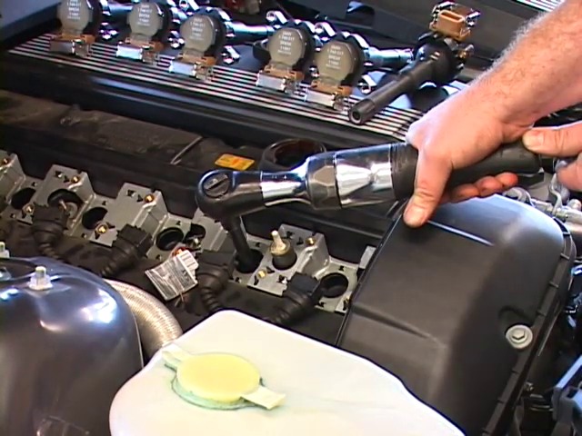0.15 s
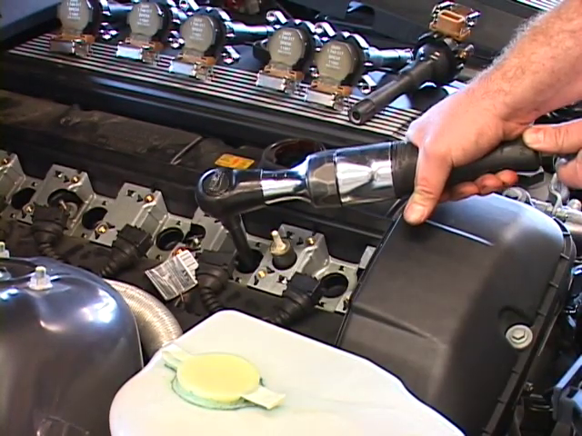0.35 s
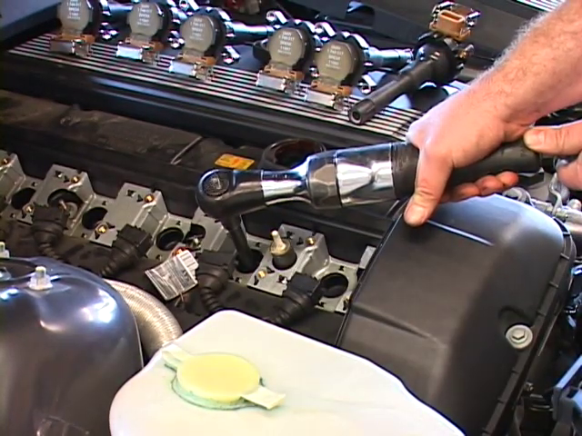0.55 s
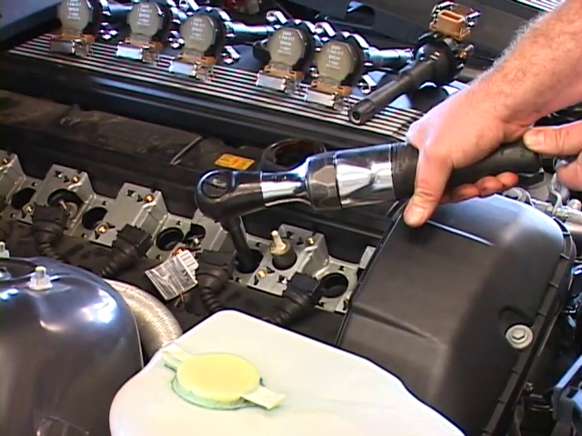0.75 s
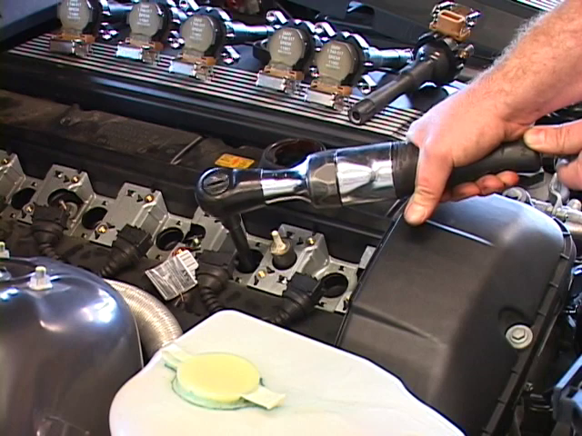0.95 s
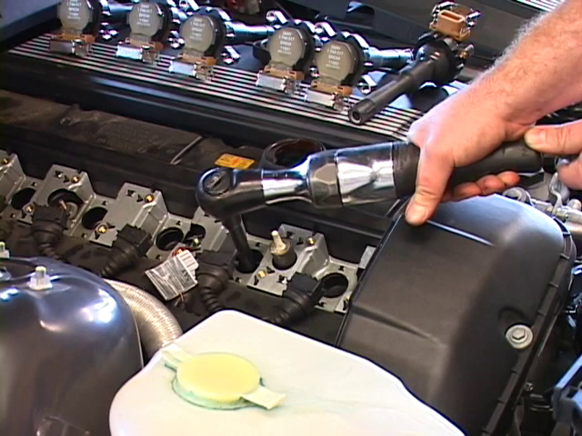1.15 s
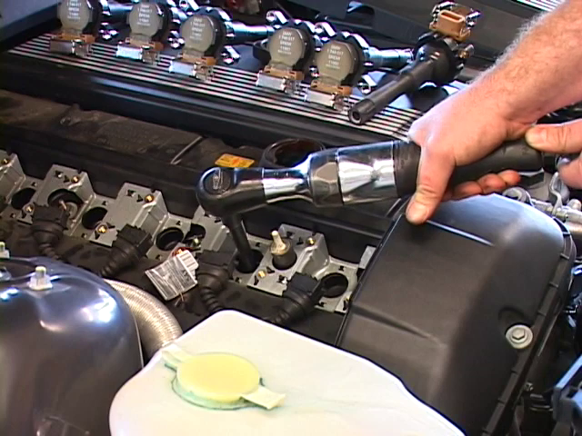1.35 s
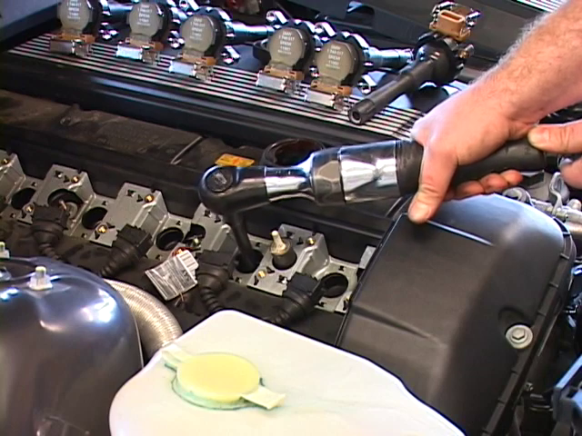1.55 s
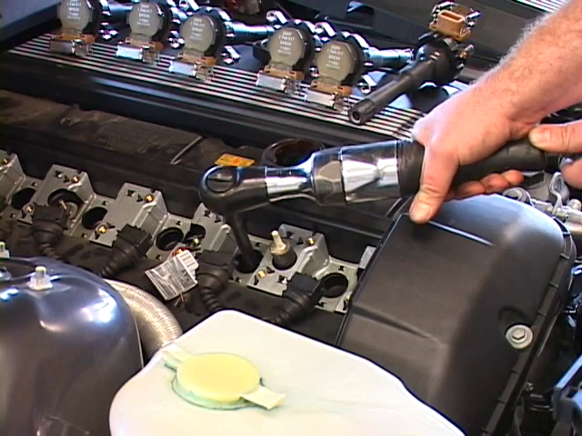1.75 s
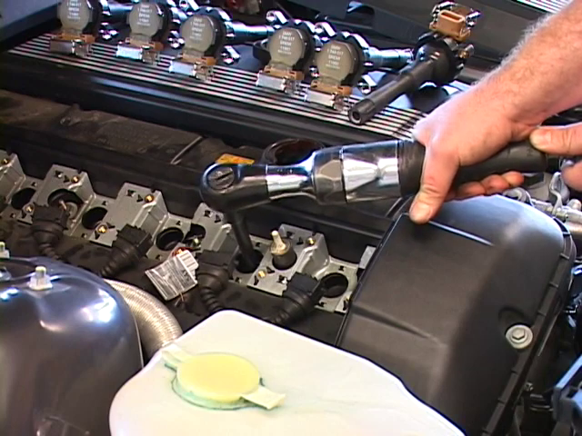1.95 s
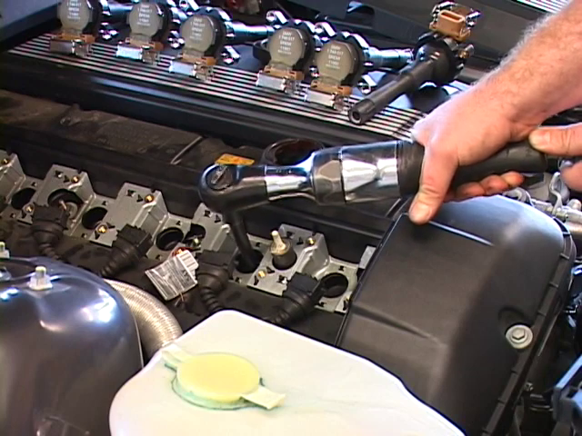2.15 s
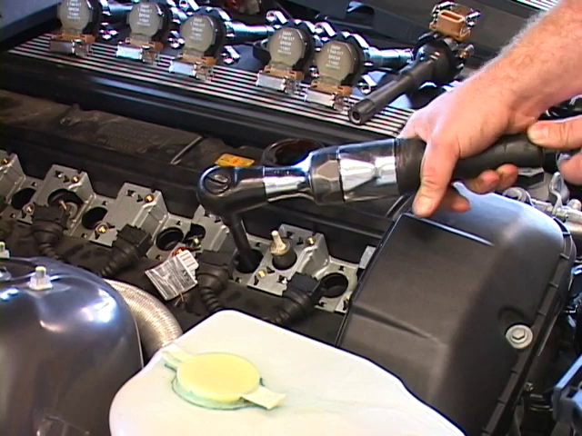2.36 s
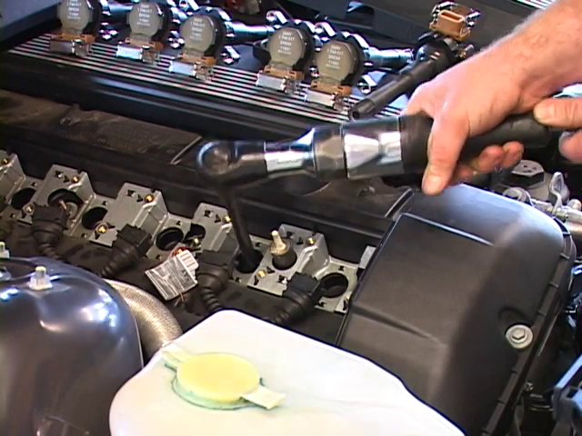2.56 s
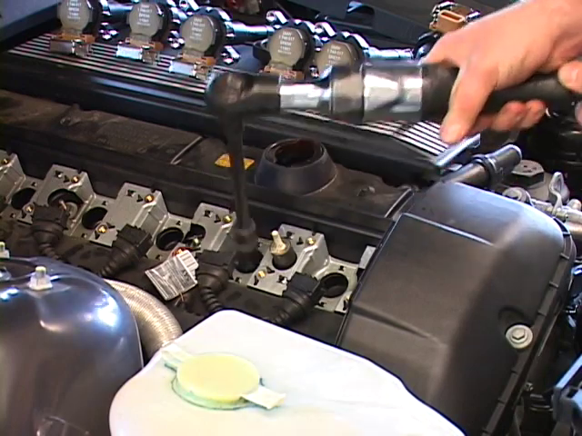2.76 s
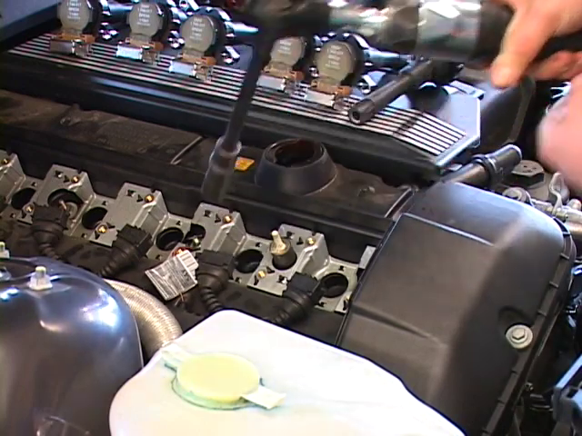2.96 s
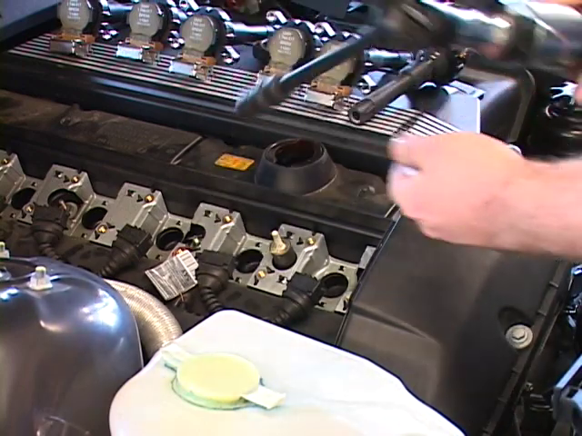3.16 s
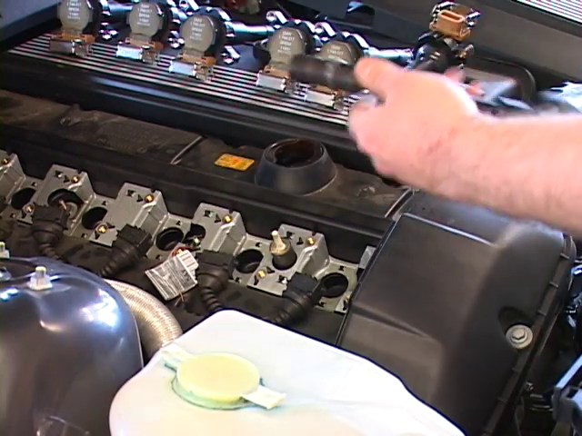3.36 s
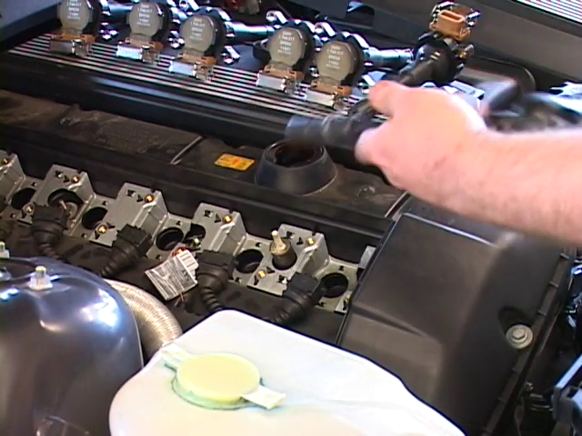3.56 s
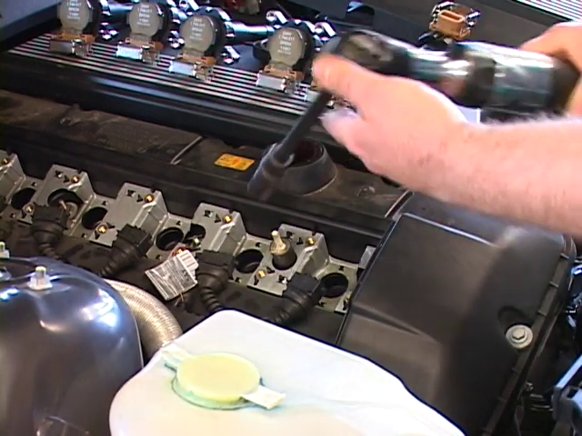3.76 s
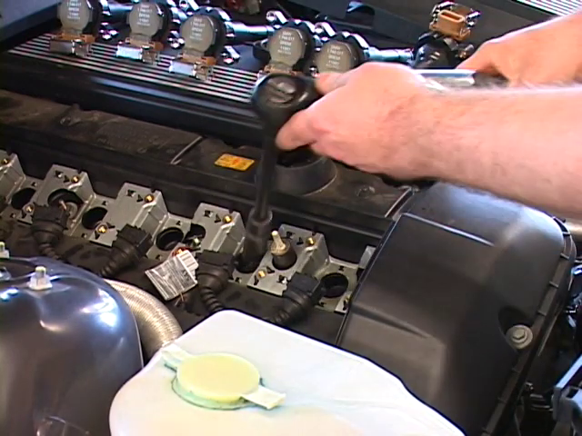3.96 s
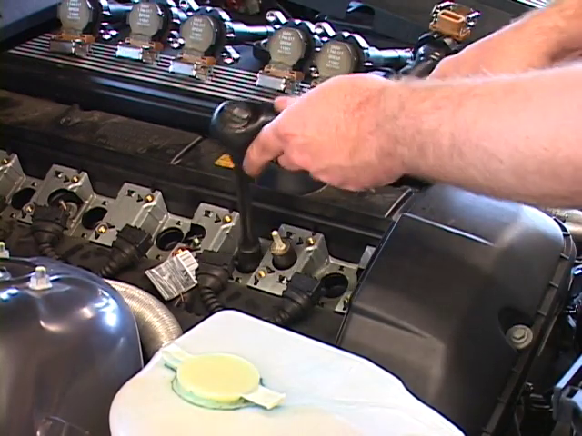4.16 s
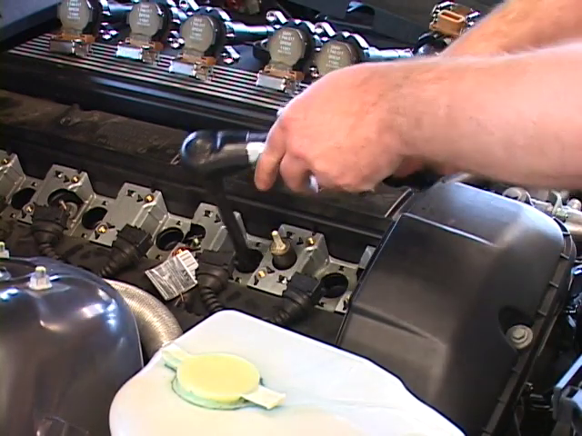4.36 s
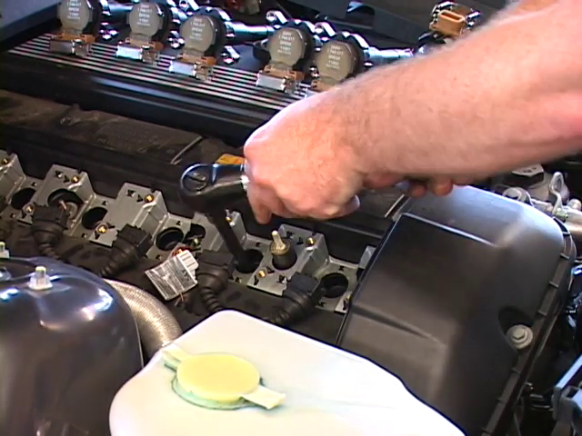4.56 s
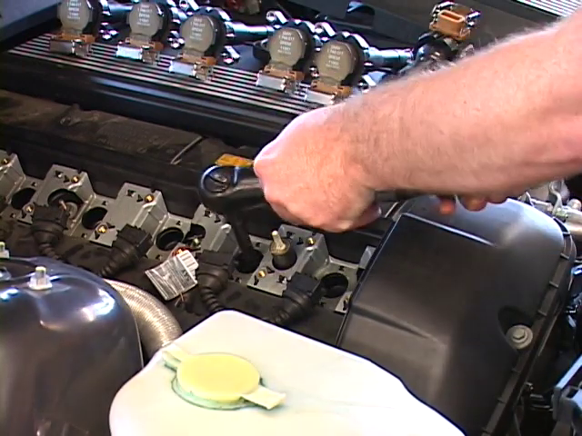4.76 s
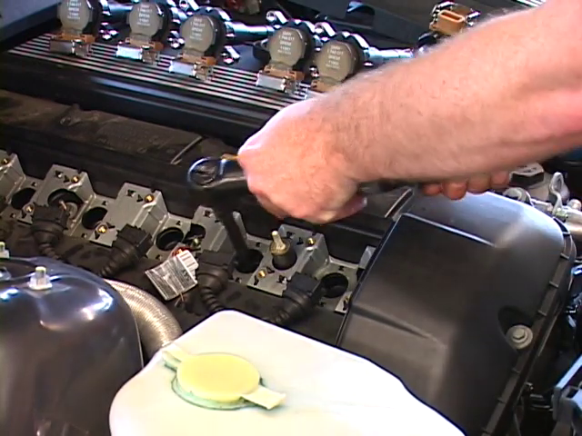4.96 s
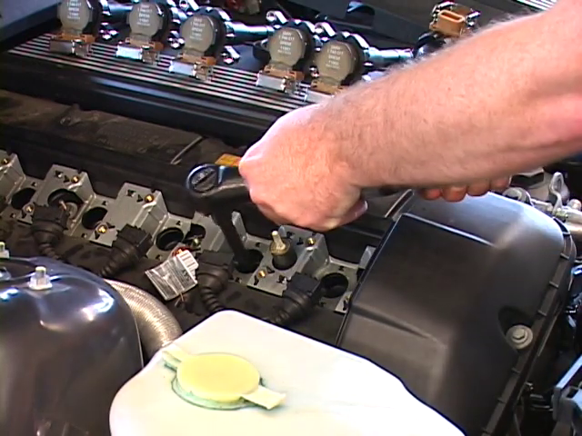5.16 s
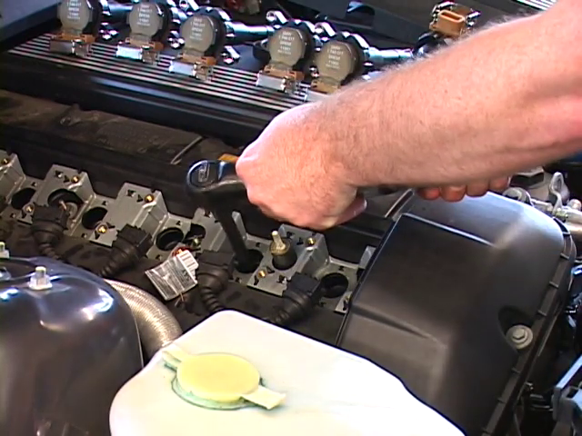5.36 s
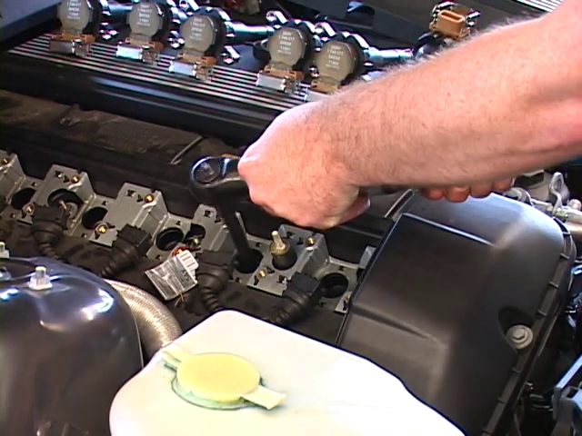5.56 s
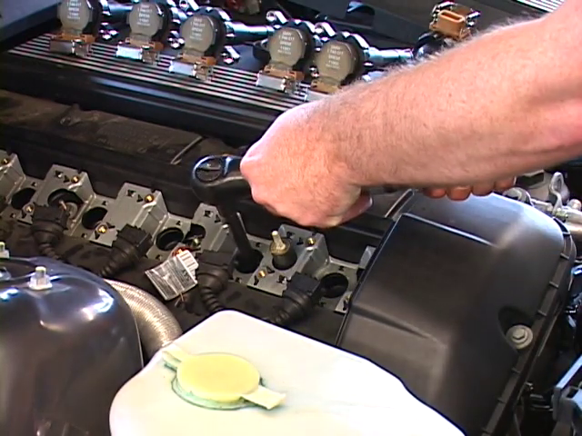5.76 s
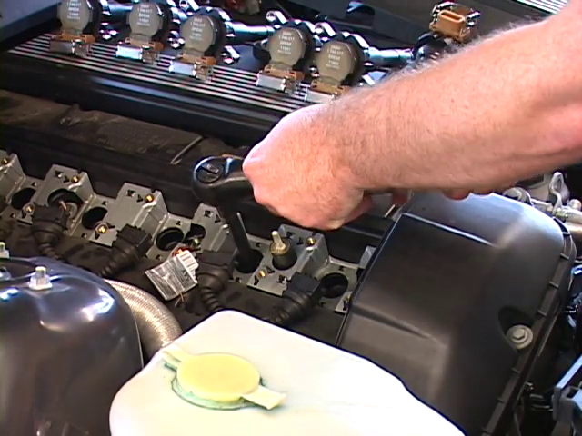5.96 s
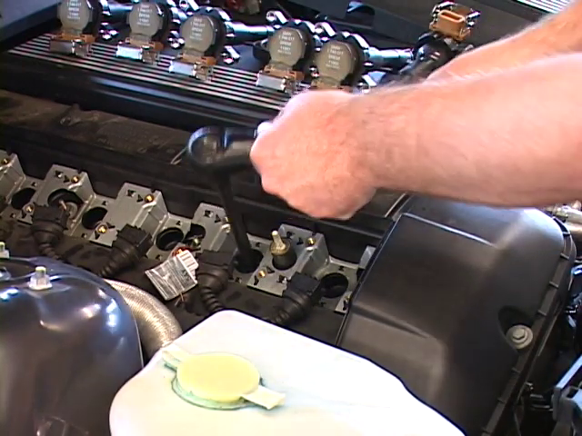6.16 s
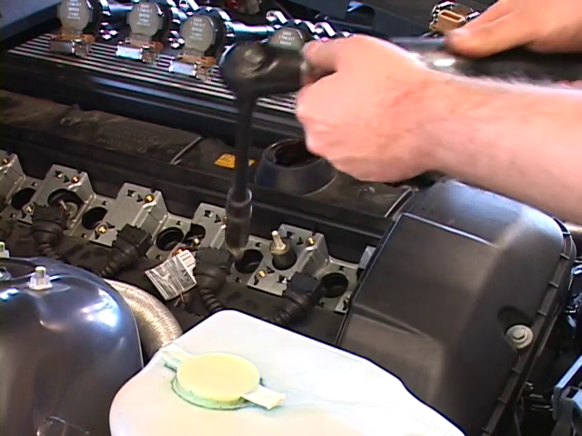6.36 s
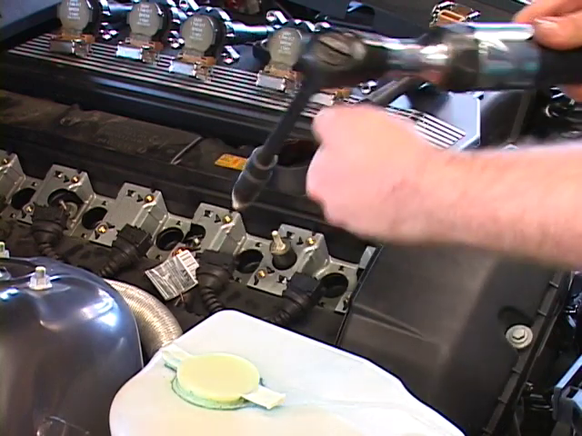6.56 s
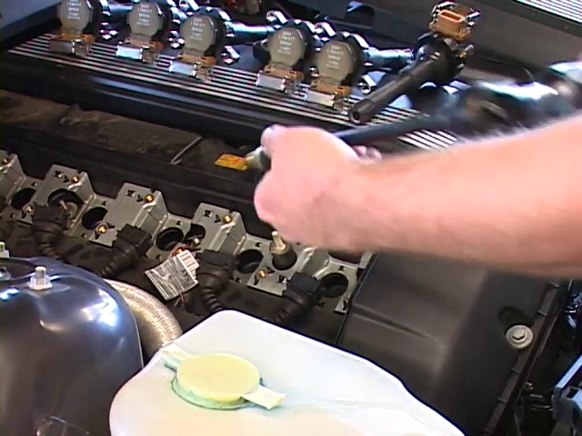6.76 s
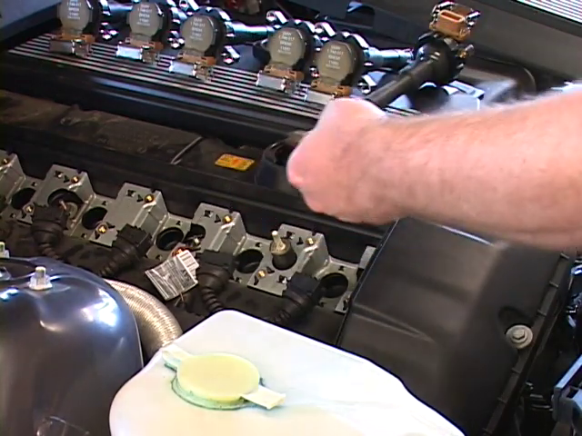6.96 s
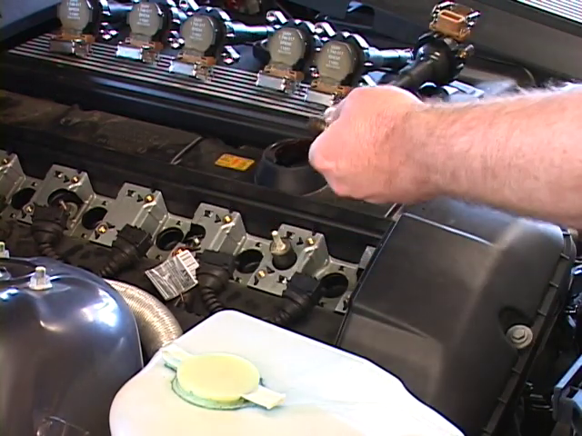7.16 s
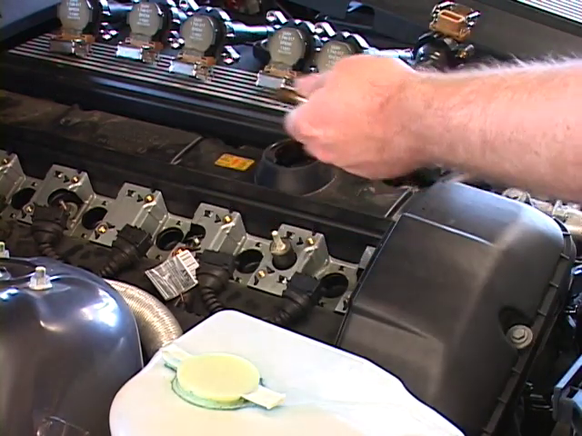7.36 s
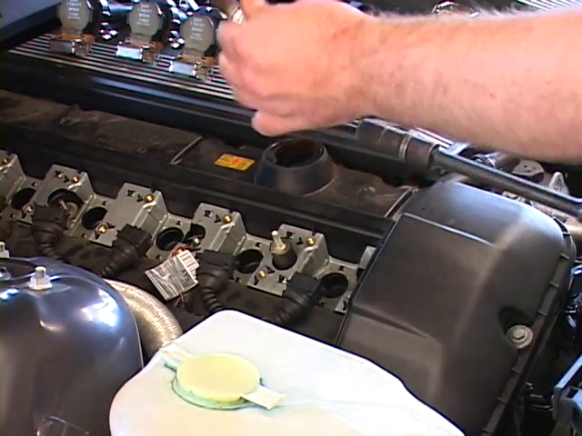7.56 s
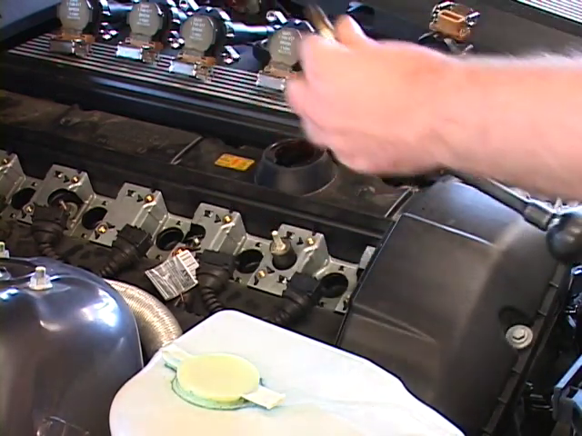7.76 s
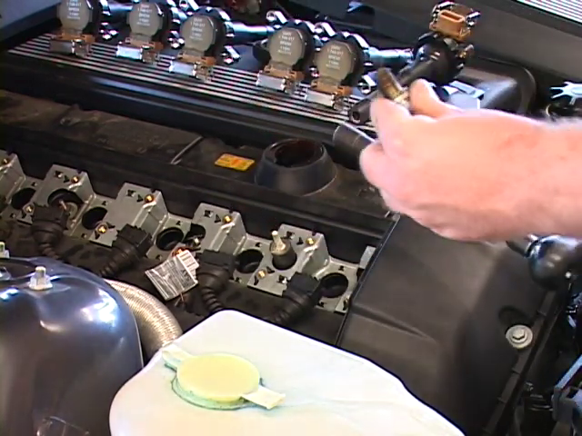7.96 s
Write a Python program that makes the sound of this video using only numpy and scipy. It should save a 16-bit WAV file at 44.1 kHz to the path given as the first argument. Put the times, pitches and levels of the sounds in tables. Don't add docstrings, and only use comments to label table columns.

```python
import sys
import numpy as np
from scipy import signal
from scipy.fft import rfft, irfft, next_fast_len
from scipy.io import wavfile
from scipy.ndimage import map_coordinates

SR = 44100
rng = np.random.default_rng(int(sys.argv[2]) if len(sys.argv) > 2 else 0)


def log_audio(samples):
    frames = np.atleast_2d(samples).T
    limited = np.clip(frames, -1, 1)
    pcm = np.round(limited * 32767).astype(np.int16)
    wavfile.write(sys.argv[1], SR, pcm)


def voltage_ratio(level):
    return 10 ** (np.asarray(level, float) / 20)


N = 353285


def unit(x):
    return x / np.sqrt(np.mean(x ** 2) + 1e-20)


def along(points, hz):
    f, v = np.transpose(points)
    return np.interp(np.log(hz + 1), np.log(f + 1), v)


def curves(rows):
    s, *cols = np.transpose(sorted(rows))
    return [np.interp(np.arange(N) / SR, s, c) for c in cols]


def wobble(rate):
    coarse = np.arange(0, N + 32, 32)
    knots = rng.standard_normal(int(N * rate / SR) + 4)
    return np.interp(np.arange(N), coarse, map_coordinates(knots, [coarse * rate / SR]))


def filtered(x, response):
    m = next_fast_len(N + SR // 2)
    return irfft(rfft(x, m) * response(np.fft.rfftfreq(m, 1 / SR)), m)[..., :N]


# frequency in Hz, left-right likeness from 0 to 1.
LIKENESS = [(60, 0.89), (500, 0.96), (2000, 0.33), (6000, 0.35), (14000, 0.37)]


def spread(pair, spectrum):
    def mid_and_side(hz):
        turn = np.arccos(np.clip(along(LIKENESS, hz), -1, 1)) / 2
        return voltage_ratio(along(spectrum, hz)) * [np.cos(turn), np.sin(turn)]

    mid, side = filtered(pair, mid_and_side)
    return unit(np.array([mid + side, mid - side]))


# frequency in Hz, time to fall 60 dB in seconds.
GARAGE_T60 = [(100, 0.24), (600, .75), (1000, 1.0), (3000, 0.89), (8000, 0.5), (14000, 0.21)]


def garage(x):
    hz, t, z = signal.stft(rng.standard_normal((2, 3 * SR // 2)), SR, nperseg=256)
    decay = voltage_ratio(-60 * t / along(GARAGE_T60, hz)[:, None])
    a, b = signal.istft(z * decay, SR, nperseg=256)[1]
    tail = np.array([a + .45 * b, a - .45 * b])
    late = np.pad(np.atleast_2d(x), ((0, 0), (300, 0)))
    return signal.fftconvolve(late, tail / np.linalg.norm(tail[0]), axes=1)[:, :N]


# time in seconds, firing rate in Hz, level in dB.
ENGINE_REV = [
    (0, 66, -48),
    (.4, 73, -49.5),
    (.8, 79, -52),
    (1.2, 87, -52),
    (1.45, 90, -57),
]


def drone():
    hz, db = curves(ENGINE_REV)
    turn = 2 * np.pi * np.cumsum(hz) / SR
    first = voltage_ratio(db + 1.5 * wobble(4.5)) * np.sin(turn)
    second = voltage_ratio(db - 1.0 + 1.9 * wobble(5.8)) * np.sin(2 * turn)
    return first + second


def gain_control():
    t = np.arange(N) / SR
    depth_db, recover_s = 8.5, 1.16
    cuts = []
    for opened, shut, *_ in RUNS:
        cut_db = depth_db + SURGE_DB * np.exp(-np.abs(t - opened) / SURGE_S)
        attack = np.clip((t - opened) / 0.12, 0, 1)
        release = np.exp(-np.clip(t - shut, 0, None) / recover_s)
        cuts.append(cut_db * attack * release)
    return -np.max(cuts, axis=0)


# frequency in Hz, width in Hz, level in dB, sign at the microphone.
INTAKE_MODES = [(24, 8, -11, 1), (48, 6, 0, -1), (60, 7, -4, -1), (72, 7, -5, -1), (98, 7, -1, 1),
                (108, 7, -4, 1), (124, 10, -11, 1), (151, 10, -9, -1), (180, 6, -9, 1), (216, 6, -11, 1),
                (244, 9, -9, -1), (264, 5, -4, 1), (288, 5, -5, 1), (318, 9, -8, 1), (350, 6, 1, -1),
                (384, 4, 1, 1), (418, 5, 0, -1), (456, 4, -6, -1), (488, 10, 3, 1), (540, 6, -9, -1),
                (575, 6, -6, -1), (625, 6, -6, 1), (690, 24, -11, 1), (765, 20, -12, 1)]
# frequency in Hz, level in dB per Hz.
WHIR_NOISE = [(25, -34), (60, -25), (130, -22), (200, -25), (350, -20), (600, -20),
              (850, -21.5), (1500, -21), (2060, -25), (4700, -29.5), (8000, -42.5), (12700, -59.5),
              (13500, -80), (14000, -130)]


def compressor():
    t = np.arange(N) / SR
    start_s, rise_s = 1.36, .07
    stroke_s, crank_hz = 7.0084, 11.995
    started = np.clip((t - start_s) / rise_s, 0, 1)
    kick_db = 2 * np.exp(-np.abs(t - start_s) / .1)
    thump_db = -29 + kick_db - 45 * (1 - started)
    idle_db, running_db = -48, -26
    whir_db = idle_db + (running_db - idle_db) * np.clip((t - start_s) / 0.13, 0, 1)

    lag = 0.247 * np.exp(-np.abs(t - 1.3) / 0.302)
    turns = np.floor((t - stroke_s) * crank_hz + lag)
    pulses = np.diff(turns, prepend=turns[0]) * voltage_ratio(.4 * wobble(12))
    lean_db = rng.normal(0, 1.7, len(INTAKE_MODES))[:, None] * [1, -1] + [.9, -.9]

    def ring(f):
        soft = (1 + 1j * f / 300) / (1 + 1j * f / 1100) ** 4
        total = 0
        for (center, width, db, sign), lean in zip(INTAKE_MODES, lean_db):
            damped = 1j * f * width * 0.7
            mode = 1j * f * width / (center * center - f * f + damped)
            total = total + sign * voltage_ratio(db + lean)[:, None] * mode
        return soft * total

    thumps = voltage_ratio(thump_db) * unit(filtered(pulses, ring))
    noise = spread(rng.standard_normal((2, N)), WHIR_NOISE)
    whir = voltage_ratio(whir_db - 4.5 + 0.17 * wobble(6)) * noise
    return voltage_ratio(gain_control()) * (thumps + whir)


# time in seconds, peak in dB, brightest band in Hz,
# low clack against the peak in dB.
BLOWS = [(2.3371, -8.5, 9000, -24), (2.852, -12, 7150, -6), (2.8525, -8.5, 4670, -9.5),
         (4.0183, -14, 4480, -2.5), (4.111, -10, 5050, -10), (4.2445, -11, 6360, -1.5),
         (4.2535, -9.5, 5080, -10), (4.438, -16.5, 4360, -10), (4.479, -15, 5200, -19),
         (4.484, -7, 5200, -19), (4.5091, 4, 7300, -17), (4.5225, -3, 6000, -8), (4.529, -7, 5200, -17),
         (6.0053, -12, 8990, -13), (6.017, -10, 3890, -11), (6.2551, -13, 4513, -26),
         (6.2675, -7.5, 6440, -19), (6.3154, -18, 6530, -24), (6.3205, -6, 4100, -17),
         (7.4555, -12, 4940, -19), (7.4645, -16, 5200, -19), (7.4742, -14, 5700, -12)]
# time in seconds, peak in
# dB, brightest band in Hz.
FURTHER_CLICKS = [(2.3504, -27, 8060), (2.591, -23, 5840), (2.648, -16.5, 4900), (2.7457, -27, 4940),
                  (6.465, -31, 8800), (4.0377, -18, 5000), (4.23, -24, 5080), (4.361, -22, 5050),
                  (4.447, -23, 4260), (4.473, -21, 5450), (4.924, -27, 7440), (6.2975, -22, 6430),
                  (6.4248, -26, 8300), (7.4185, -26.5, 5160), (7.43, -25, 4806), (7.445, -24, 4700)]
# frequency in Hz, level in dB.
STEEL_MODES = [(4800, 0), (5970, -4), (7200, 0), (8600, -3), (9760, -8)]
# time in seconds, level in dB.
PLUG_RINGS = [(4.437, -47), (4.482, -43), (4.524, -46), (6.267, -44), (7.456, -42), (7.465, -34),
              (7.475, -38)]
PLUG_PAIR = (12700, 12900)
# time in seconds, level in dB, pitch in Hz.
BUMPS = [(.385, -35, 231.9), (.385, -35, 316), (0.959, -36, 280.4), (1.45, -31, 329.6), (1.52, -23, 368),
         (1.58, -27, 390), (1.63, -28, 350), (1.67, -25, 385), (1.72, -28, 377), (4.345, -18.5, 910),
         (4.352, -13.5, 710), (4.512, -14.5, 1410), (4.942, -15, 1030), (4.947, -9, 740),
         (4.95, -15.5, 313), (4.968, -14, 800)]


def clicks():
    out, t = np.zeros(N + SR), np.arange(SR // 4) / SR

    def add(s, sound):
        out[round(s * SR):][:len(t)] += sound

    broad_band = signal.butter(2, [2000, 9500], "band", fs=SR)
    clack_band = signal.iirpeak(2600, 2.8, SR)
    further_clicks = [(*touch, -19) for touch in FURTHER_CLICKS]
    for s, db, hz, clack_db in BLOWS + further_clicks:
        envelope = (1 - np.exp(-t / 0.0006)) * np.exp(-t / .0032)
        crunch = envelope * rng.standard_normal((3, len(t)))
        bright = 4 * signal.lfilter(*signal.iirpeak(hz, 4, SR), crunch[0])
        broad = .7 * signal.lfilter(*broad_band, crunch[1])
        clack = voltage_ratio(clack_db + 17) * signal.lfilter(*clack_band, crunch[2])
        modes = 0
        for mode_hz, mode_db in STEEL_MODES:
            level = voltage_ratio(mode_db - 17 + rng.normal(0, 4) - 60 * t / .015)
            modes = modes + level * np.sin(2 * np.pi * mode_hz * rng.normal(1, .05) * t)
        add(s, voltage_ratio(db - 9) * (bright + broad + clack + modes))

    for s, db in PLUG_RINGS:
        beating = sum(np.sin(2 * np.pi * hz * t) for hz in PLUG_PAIR)
        add(s, voltage_ratio(db - 60 * t / 0.19) * beating)

    for s, db, hz in BUMPS:
        swell = 1 - np.exp(-t * hz / 3.3)
        add(s, voltage_ratio(db + 11.5 - 60 * t * hz / 18) * swell * np.sin(2 * np.pi * hz * t))
    return out[:N]


# opened in seconds, shut in seconds, loaded vane rate in Hz, vane tone in dB,
# octave in dB.
RUNS = [
    (-1.0, 2.288, 1026, -30, -21),
    (5, 5.958, 1029, -28.5, -13.5),
]
# time in seconds, swell in dB.
THREAD_BINDS = [(.07, 8), (.21, 8), (.41, 6), (.55, 8), (.88, 11), (1.19, 9), (1.55, 9), (1.88, 9),
                (2.25, 8.5), (5.13, 8), (5.33, 9), (5.64, 7), (5.8, 10), (5.9, 7)]
# vane rate in Hz, level in dB.
VANE_RESPONSE = [(60, -50), (140, -16), (390, 1), (800, 17.5), (1000, -0.5), (1150, 1.5)]
OCTAVE_RESPONSE = [(60, -52), (140, -16), (390, -18), (720, -13), (900, -6.5), (1010, 1), (1150, -7)]
SPIN_DOWN_DB = (3.5, 0)
SURGE_DB, SURGE_S = 3.5, 0.25


def rotor():
    t = np.arange(N) / SR
    run = (t > 3.5) * 1
    opened, shut, loaded_hz, tone_db, octave_db = np.array(RUNS)[run].T
    on, off = np.clip(t - opened, 0, None), np.clip(t - shut, 0, None)
    running = (on > 0) & (off == 0)
    rest_s = 0.061
    still_db = -80 * ((on == 0) | (off > rest_s + .02))

    coarse = t[::64]
    swells = sum(db * np.exp(-((coarse - s) / .065) ** 2) for s, db in THREAD_BINDS)
    bind_db = np.interp(t, coarse, swells)
    freed_hz = 0.44 * (np.roll(bind_db, SR // 20) - 4)
    overshoot_hz = 150.5 * np.exp(-(on / .3) ** 2)
    goal_hz = loaded_hz - 2.6 * on + overshoot_hz + freed_hz
    spin_up, coast = 1 - np.exp(-(on / .052) ** 2), np.exp(-(off / .04) ** 1.5)
    hz = np.maximum(goal_hz * spin_up * coast, 55)

    loaded_db = -6.5 * np.clip((hz - 650) / 150, -1, 1) * (hz < 900)
    waver_db = 1.5
    tone_db = tone_db + along(VANE_RESPONSE, hz) + still_db
    tone_db += running * (bind_db + loaded_db + waver_db * wobble(14))
    tone_db += np.take(SPIN_DOWN_DB, run) * (off > 0)
    octave_db = octave_db + along(OCTAVE_RESPONSE, hz) + running * waver_db * wobble(20) + still_db

    coast_puff = voltage_ratio(-17.5) / (1 + (off / rest_s) ** 16) * (off > 0)
    puff = np.exp(-off / 0.0062) + coast_puff
    opening_db = -650 * np.clip(opened + 0.028 - t, 0, None)
    air_db = -12.5 + SURGE_DB * np.exp(-on / SURGE_S) + opening_db + 20 * np.log10(puff + 1e-9)
    return hz, tone_db, octave_db, np.maximum(air_db, -90)


GEAR_ORDERS = [7, 8, 9, 15, 17, 18, 29, 31, 33, 34, 36, 37, 44, 48, 52, 60, 64, 75, 96, 112]
GEAR_LEVELS = [-38, -37, -38, -26, -32, -37, -43, -40, -43, -43, -36, -37, -34, -15, -35, -33, -18, -33,
               -31, -31]
# frequency in Hz, level in dB per Hz.
EXHAUST_HISS = [(88, -30), (150, -25.5), (296, -30), (876, -19), (1020, -21.5), (1100, -16.5), (1630, -14),
                (2020, -7), (2180, -8), (3090, -7), (3600, -7.5), (8300, -5.5), (13700, -18.5),
                (15400, -19.5)]


def ratchet():
    vane_hz, tone_db, octave_db, air_db = rotor()
    stroke_hz = vane_hz / 16
    vane = 2 * np.pi * np.cumsum(vane_hz * (1 + .0012 * wobble(40))) / SR
    stroke = vane / 16

    unsteady = np.clip(np.abs(np.gradient(vane_hz)) * SR / 8000, 0, 1)
    tone_amp = voltage_ratio(tone_db + 3.5 + 0.37 * unsteady * wobble(130))
    octave_amp = voltage_ratio(octave_db + 1.5 + 5.6 * unsteady * wobble(150))
    whine = tone_amp * np.sin(vane + 0.27 * unsteady * wobble(200))
    whine += octave_amp * np.sin(2 * vane + 0.44 * unsteady * wobble(300))

    gears = 0
    for order, db in zip(GEAR_ORDERS, GEAR_LEVELS):
        housing = 1 + 3.5 / (1 + ((order * stroke_hz - 2000) / 300) ** 2)
        phase = order * stroke + 0.0072 * order * wobble(30) + rng.uniform(0, 2 * np.pi)
        gears = gears + voltage_ratio(db + 1.6 * wobble(12)) * housing * np.sin(phase)
    free_db = .025 * np.clip(vane_hz - 1020, 0, None)
    gears = voltage_ratio(air_db - 5 * unsteady + free_db) * gears

    chop = 1 + 0.22 * np.cos(vane) + 0.041 * np.cos(stroke)
    clatter = voltage_ratio(1.06 * wobble(300) + 0.35 * wobble(20))
    air = spread(chop * clatter * rng.standard_normal((2, N)), EXHAUST_HISS)
    return whine + gears, voltage_ratio(air_db - 0.5) * air, air_db


def far_end(tones):
    def answer(hz):
        bands = sum(share / (1 + ((hz - c) / 90) ** 2) for c, share in [(1030, 1), (2050, .1), (3070, .25)])
        round_trip_s = .345
        return voltage_ratio(-9) * bands * np.exp(-2j * np.pi * hz * round_trip_s)

    return filtered(tones, answer) * [[1.5], [.5]]


def scene():
    tones, air, air_db = ratchet()
    steel = filtered(clicks(), lambda hz: 1 / (1 + (hz / 13800) ** 30))
    near = (tones + steel + air) * voltage_ratio([[.4], [-.4]])
    ducking = voltage_ratio(-9 * np.clip((air_db + 24.5) / 22, 0, 1))
    dull = filtered(tones, lambda hz: 1 / (1 + (hz / 1250) ** 4))
    tool_room = garage(voltage_ratio(-2.5) * dull + voltage_ratio(-6.5) * air) + far_end(tones)
    room = ducking * tool_room + voltage_ratio(-9) * garage(steel)
    return near + room + compressor() + drone()


def band_limit(x):
    return signal.sosfilt(signal.butter(12, 15580, fs=SR, output="sos"), x)


def record(dry):
    rounded = dry / (1 + np.abs(dry / 0.91) ** 6) ** (1 / 6)
    mix = filtered(rounded, lambda hz: hz < 15100)
    return band_limit(mix)


dry = scene()
out = record(dry)
log_audio(out)
```